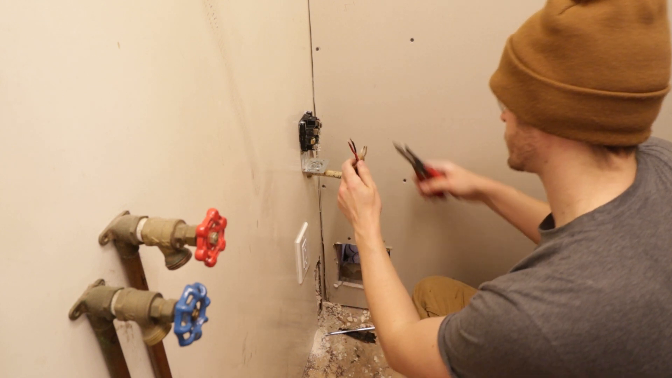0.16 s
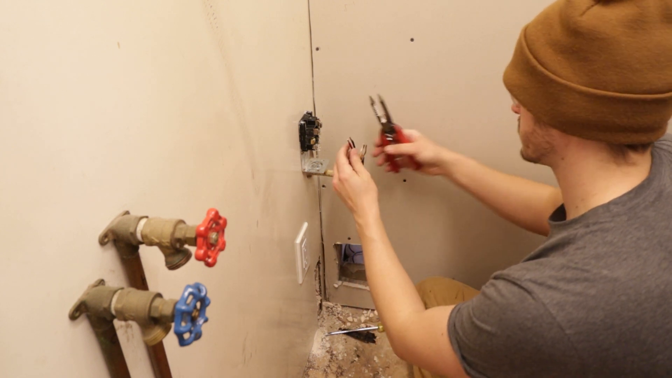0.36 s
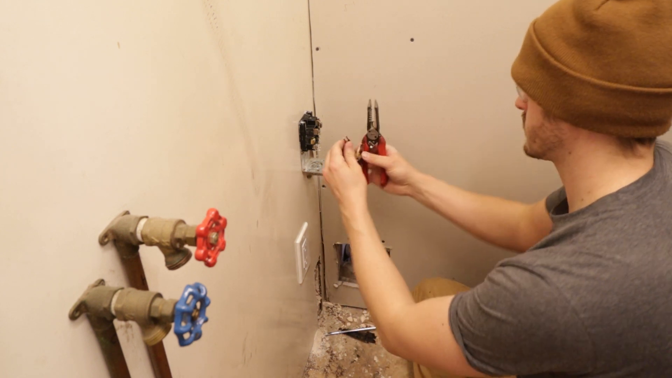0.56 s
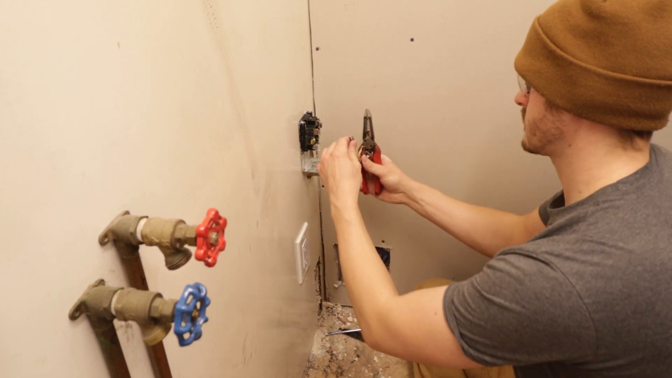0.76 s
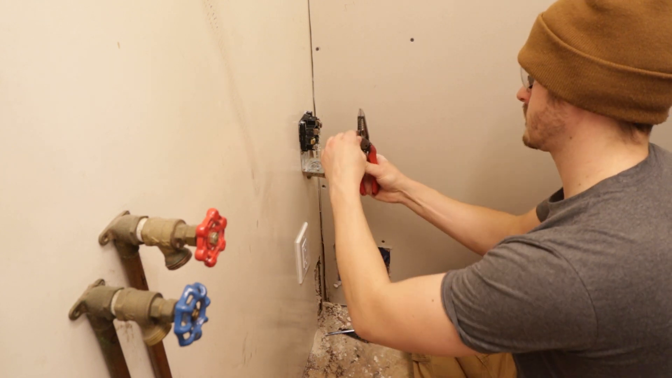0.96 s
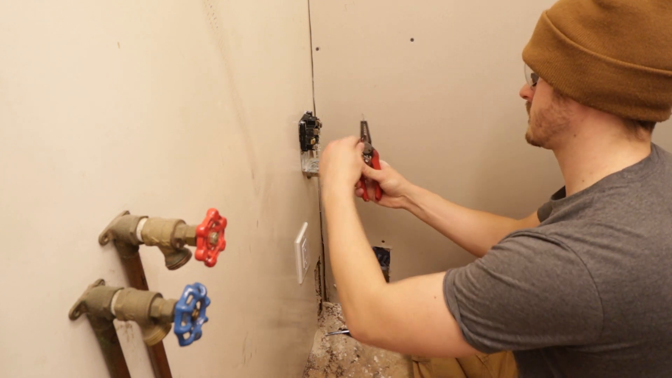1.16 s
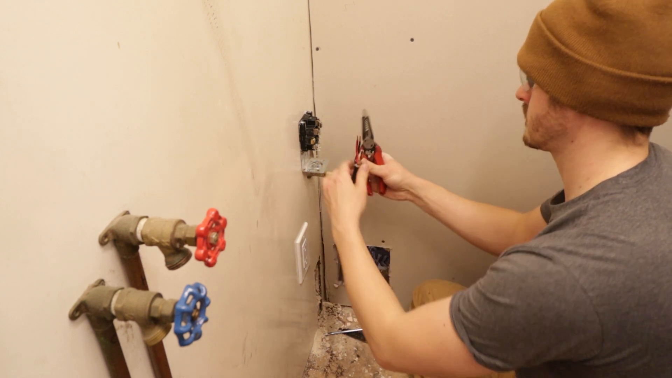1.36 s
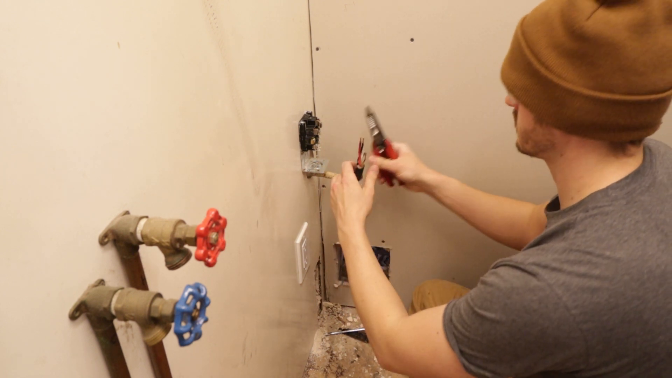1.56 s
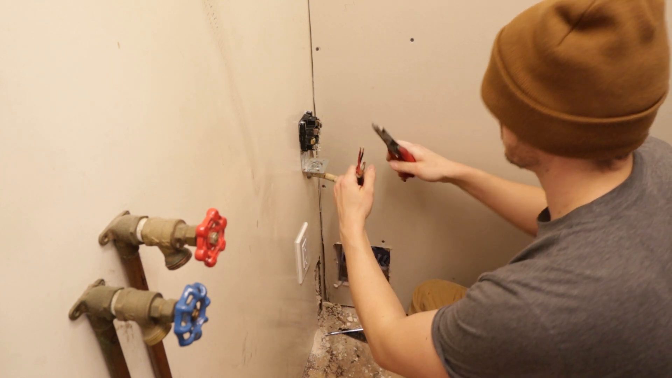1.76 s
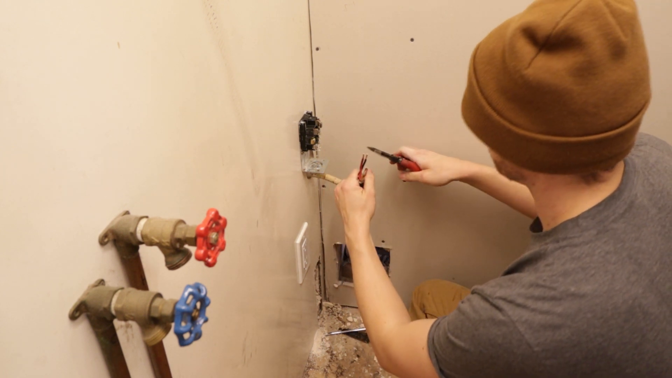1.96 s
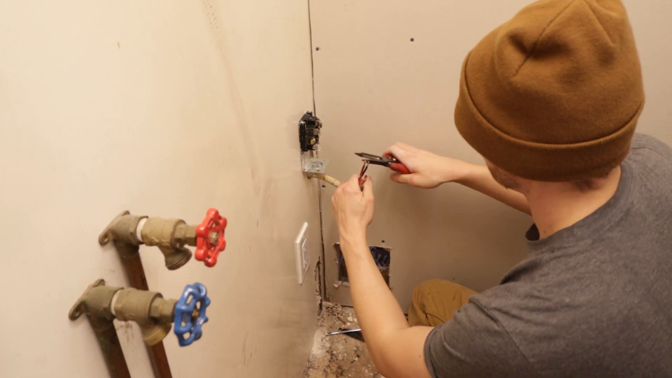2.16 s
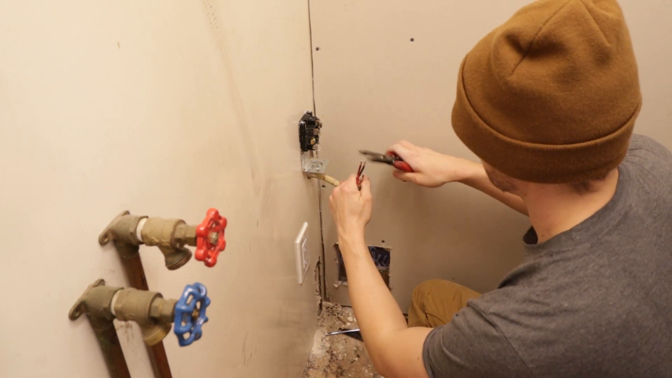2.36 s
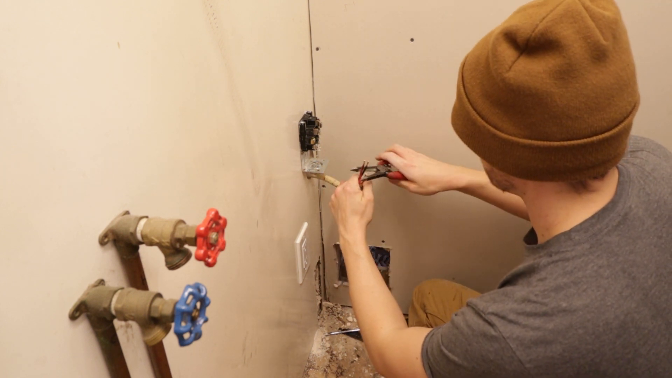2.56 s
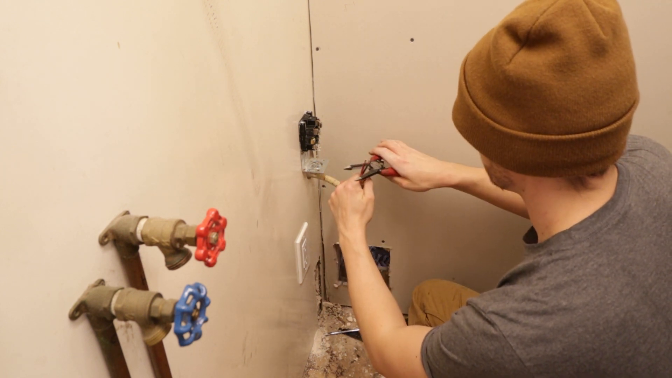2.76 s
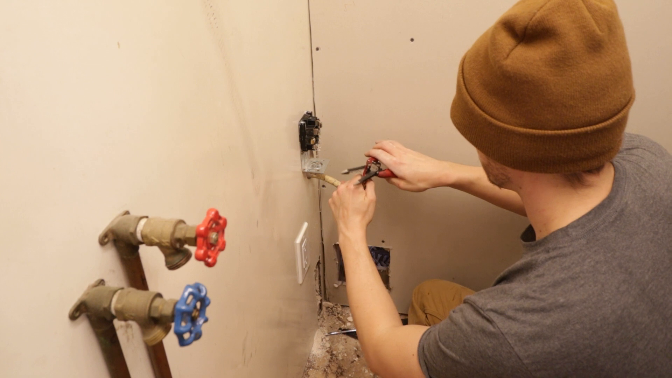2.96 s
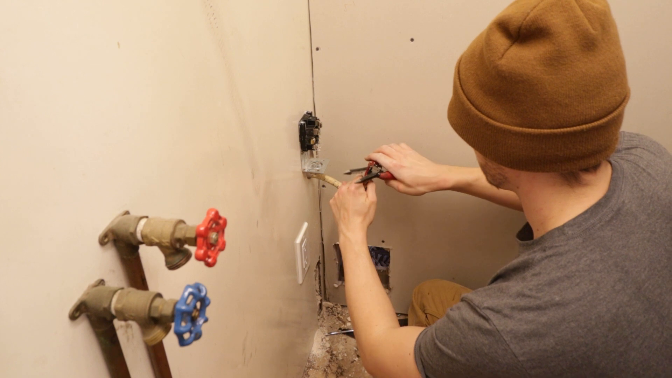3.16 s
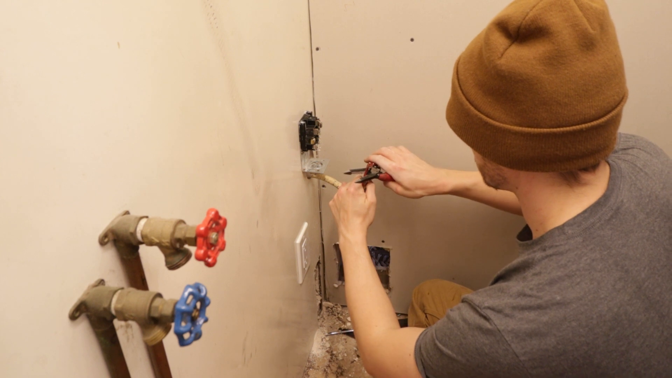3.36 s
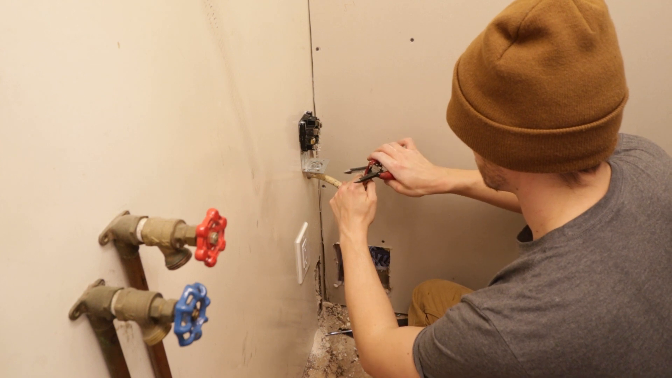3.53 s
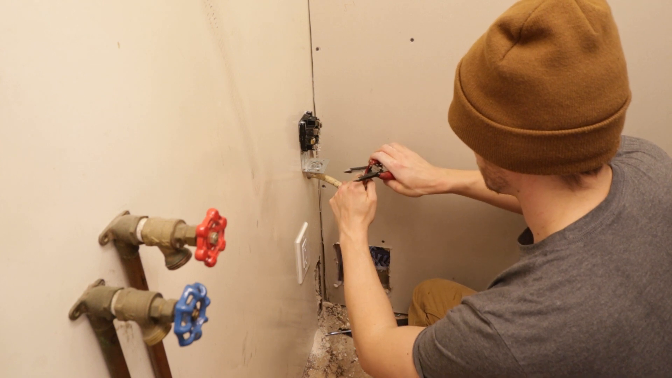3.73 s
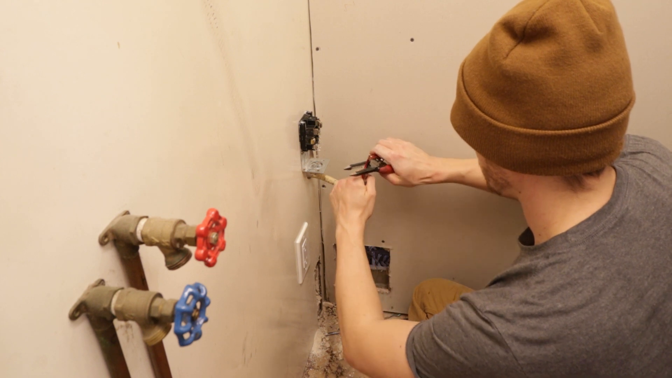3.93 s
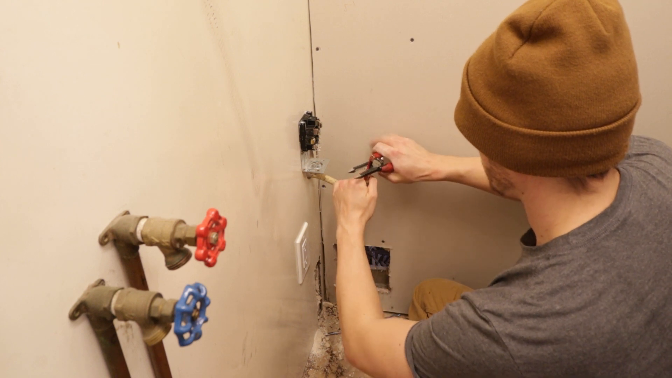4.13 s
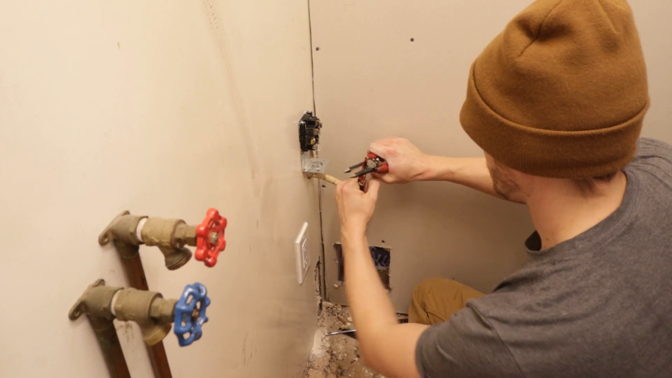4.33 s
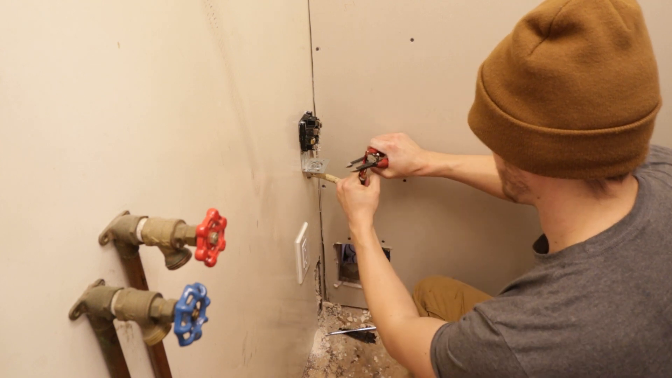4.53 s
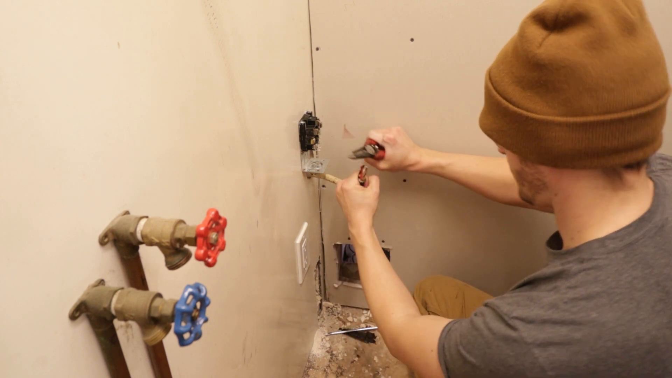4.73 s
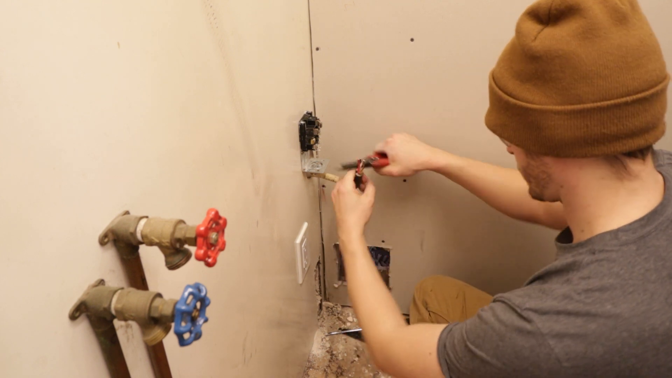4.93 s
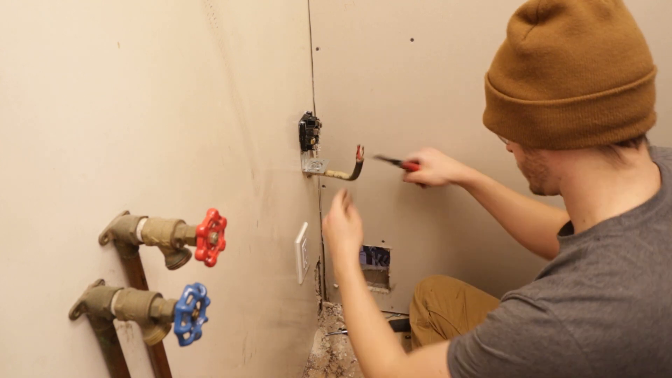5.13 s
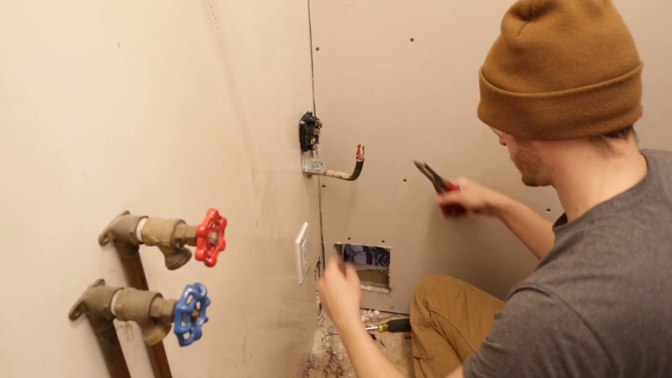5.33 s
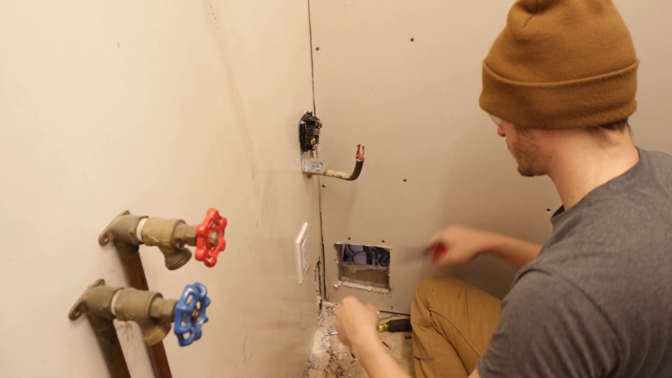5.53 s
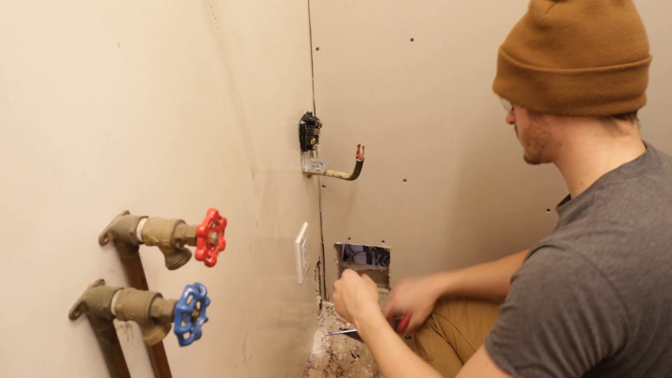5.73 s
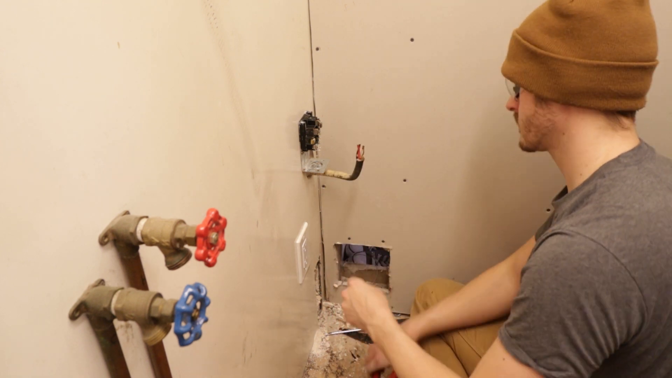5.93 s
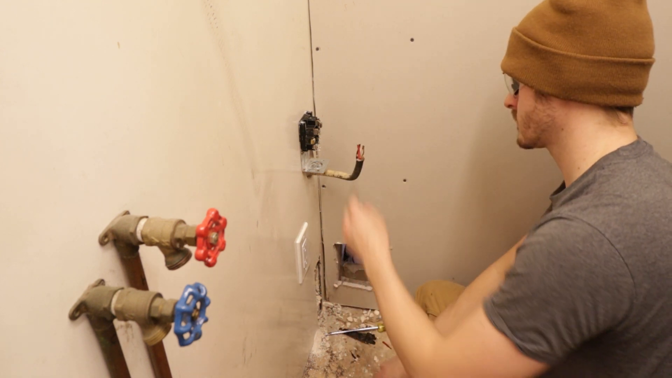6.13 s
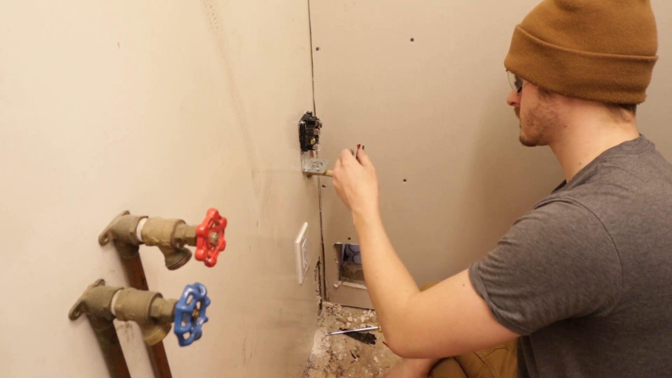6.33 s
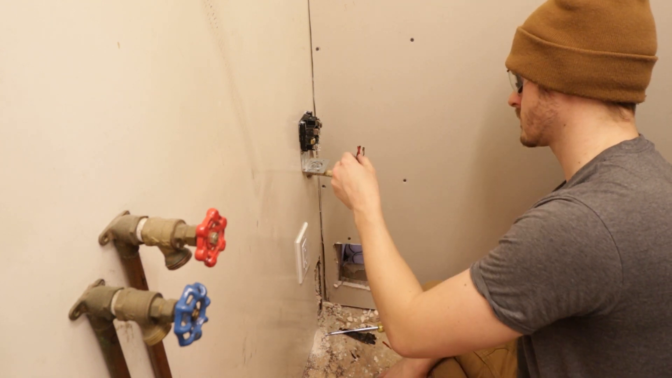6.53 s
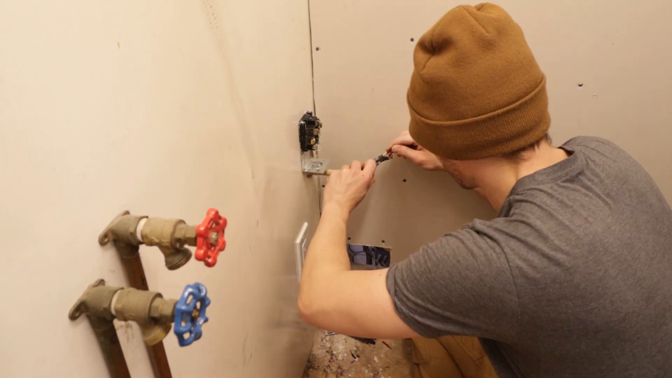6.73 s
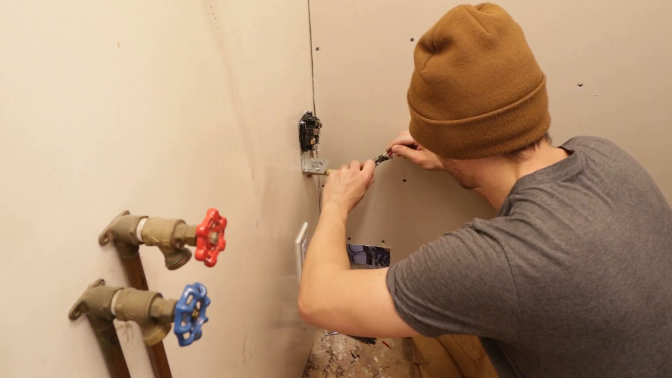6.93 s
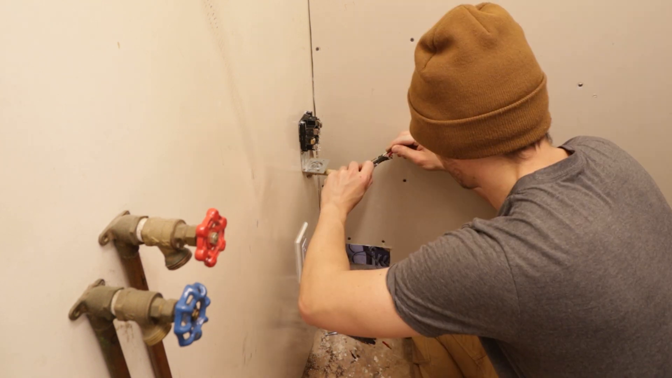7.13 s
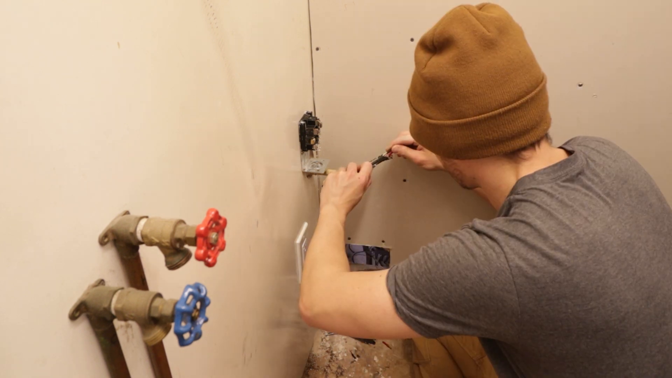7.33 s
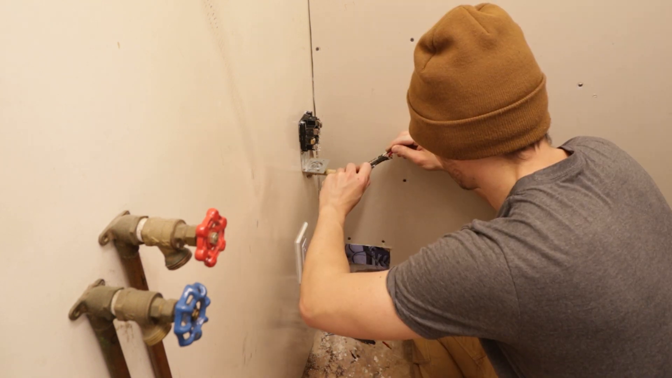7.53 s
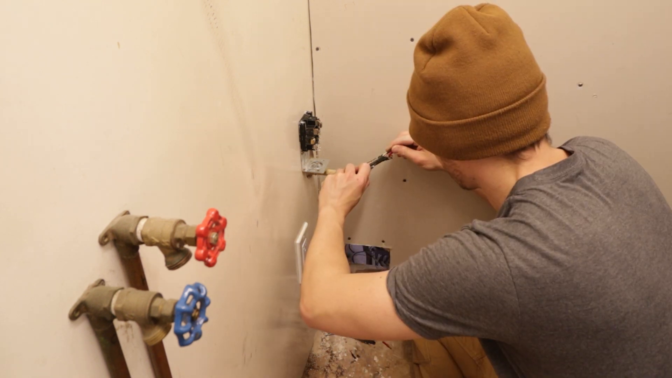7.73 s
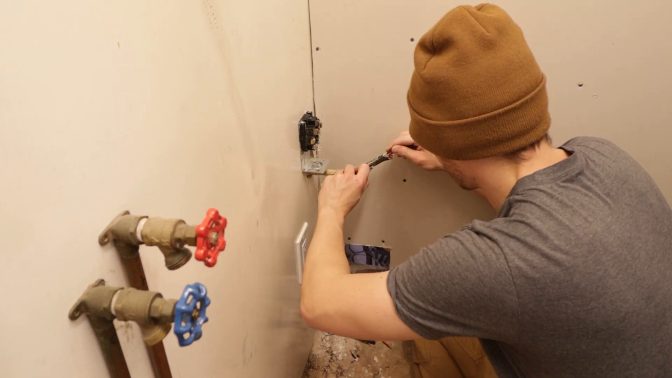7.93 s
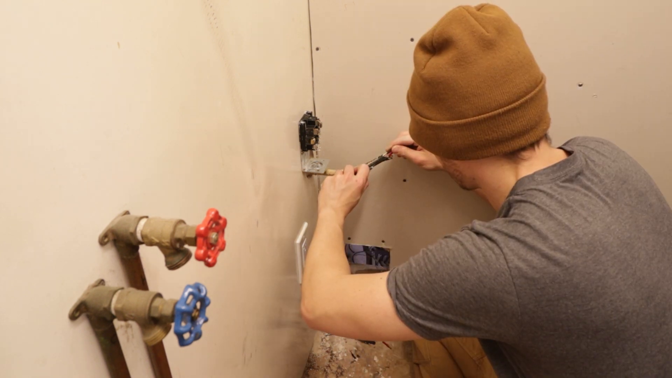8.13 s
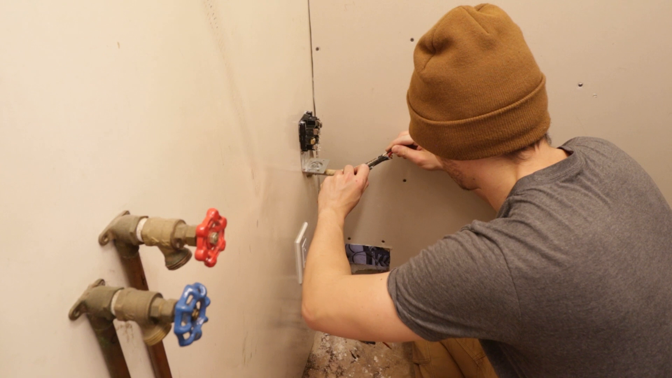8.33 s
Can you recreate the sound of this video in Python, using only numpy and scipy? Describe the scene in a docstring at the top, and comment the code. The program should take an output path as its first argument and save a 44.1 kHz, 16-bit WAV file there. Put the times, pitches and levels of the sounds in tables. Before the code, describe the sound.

In a small bare room, metal strippers click, scrape softly, bite through copper with one sharp snap, followed by tool clatter and hollow drywall knocks.

```python
"""Hand wire strippers clack open, are worked onto a copper cable in a wall, and bite through with one loud snap.
The offcut strikes wall and floor, the tool is put down, and a hand bends the cable, which thumps in the drywall.
Contacts ring resonant bodies through a small bare room; rubs, scratches and groans are swells of coloured noise.
Sleeves rustle over still air and a faint hum. One microphone feeds both channels, with a trace of hiss between them."""
import sys
import numpy as np
from scipy import signal
from scipy.fft import rfft, irfft, next_fast_len
from scipy.io import wavfile
from scipy.ndimage import uniform_filter1d, map_coordinates

SR = 44100
rng = np.random.default_rng(int(sys.argv[2]) if len(sys.argv) > 2 else 0)


def master_out(mix):
    """Clip the mix to full scale and print it as 16-bit PCM to the path in sys.argv[1]."""
    frames = np.transpose(np.atleast_2d(mix))
    ceiling = np.clip(frames, -1, 1)
    pcm = np.round(ceiling * 32767).astype(np.int16)
    wavfile.write(sys.argv[1], SR, pcm)


N = 374395
RESPONSE_SIZE = 32768  # samples
HZ = np.fft.rfftfreq(RESPONSE_SIZE, 1 / SR)
TIME_S = np.arange(N) / SR


def amp(db):
    """Decibels to gain."""
    return 10 ** (np.asarray(db) / 20)


def unit(x):
    """x at rms 1."""
    return x / np.sqrt(np.mean(x ** 2) + 1e-20)


def along(points, hz):
    """(frequency [Hz], value) points, interpolated on a log frequency axis."""
    point_hz, values = np.transpose(points)
    return np.interp(np.log(hz + 1), np.log(point_hz + 1), values)


def filtered(x, gain):
    """x times a gain that depends on frequency."""
    size = next_fast_len(N + RESPONSE_SIZE)
    spectrum = rfft(x, size) * gain(np.fft.rfftfreq(size, 1 / SR))
    return irfft(spectrum, size)[..., :N]


def causal(gain):
    """Minimum-phase response with this gain: it rings only after the blow."""
    cepstrum = irfft(np.log(np.maximum(gain, 1e-6)))
    cepstrum[1:RESPONSE_SIZE // 2] *= 2
    cepstrum[RESPONSE_SIZE // 2 + 1:] = 0
    return np.exp(rfft(cepstrum))


def lift(modes):
    """Narrow resonances as a lift in dB on the frequency grid."""
    return sum(db / (1 + (2 * (HZ - hz) / width_hz) ** 2) for hz, width_hz, db in modes)


def wobble(knots_per_s):
    """A smooth random curve through normally distributed knots."""
    knots = rng.standard_normal(int(N * knots_per_s / SR) + 4)
    return map_coordinates(knots, [TIME_S * knots_per_s])


def swell(middle_s, half_s, db):
    """A stroke's level rises and falls as a bell around its middle."""
    return amp(db) * np.exp(-((TIME_S - middle_s) / half_s) ** 2)


def rush(colour_db):
    """Noise of rms 1 in this colour."""
    response = irfft(causal(amp(colour_db)))
    return unit(signal.fftconvolve(rng.standard_normal(N), response)[:N])


# small bare room's decay: (frequency [Hz], t60 [s])
ROOM_DECAY = [(100, 0.19), (260, .25), (700, 0.1836), (1840, .21), (4850, .23), (8000, .2), (13000, 0.17)]


def corner(near_db, near_s, room_db):
    """A blow as it arrives: direct, then scattered by the close walls, then the room's tail."""
    t = np.arange(RESPONSE_SIZE) / SR
    near = rng.standard_normal(RESPONSE_SIZE) / (1 + (t / near_s) ** 6)
    hz, s, noise = signal.stft(rng.standard_normal(RESPONSE_SIZE), SR, nperseg=256)
    decay = amp(-60 * s / along(ROOM_DECAY, hz)[:, None])
    tail = signal.istft(noise * decay, SR, nperseg=256)[1][:RESPONSE_SIZE]
    direct = t == 0
    scattered = amp(near_db) * near / np.linalg.norm(near)
    return direct + scattered + amp(room_db) * tail / np.linalg.norm(tail)


def broad_gain(paths):
    """Smoothed gain of the paths; dividing by it leaves fine ripple but favours no broad band."""
    return np.sqrt(uniform_filter1d(np.abs(paths) ** 2, size=320))


def contacts(rows, body_db, near_db, near_s, room_db):
    """Each contact rings a body in the room, with its own low knock and bright edge."""
    out = np.zeros(N + RESPONSE_SIZE)
    low = 1 / (1 + (HZ / 550) ** 2)
    high = 1 - 1 / (1 + (HZ / 5500) ** 2)
    for s, db, knock_db, edge_db in rows:
        paths = rfft(corner(near_db, near_s, room_db))
        blow_db = db + body_db + knock_db * low + edge_db * high
        colour = causal(amp(blow_db) / broad_gain(paths))
        out[round(s * SR):][:RESPONSE_SIZE // 2] += irfft(paths * colour)[:RESPONSE_SIZE // 2]
    return out[:N]


def catches(rate_per_s, body_db, scatter_db, near_db, room_db):
    """Stick and slip at rms 1: small blows, uneven in time and size, ring a body in the room."""
    paths = rfft(corner(near_db, 0.0043, room_db))
    late, size = rng.random((2, 4096))
    at = ((np.arange(len(late)) + late) * SR / rate_per_s).astype(int)
    inside = at < N
    blows = np.bincount(at[inside], amp(scatter_db * size[inside]), N)
    response = irfft(paths * causal(amp(body_db) / broad_gain(paths)))
    return unit(signal.fftconvolve(blows, response)[:N])


# still air and hiss: (frequency [Hz], relative level [dB per Hz])
AIR_SPECTRUM = [(20, -21), (35, -29.5), (60, -6.5), (80, -10), (130, -12.5), (190, -17), (320, -18.5),
                (450, -21.5), (620, -23), (1000, -27), (1900, -33), (5000, -35.5), (15500, -38.5)]
# distant fan: (frequency [Hz], level [dB])
FAN_HUM = [(119, -83), (253.5, -72), (286, -81.5), (310, -87.5)]


def background():
    """Still air and hiss as coloured noise; a fan's hum as sines with slightly unsteady level and phase."""
    air = unit(filtered(rng.standard_normal(N), lambda hz: amp(along(AIR_SPECTRUM, hz))))
    hum = np.zeros(N)
    for hz, db in FAN_HUM:
        level = amp(db + wobble(6))
        hum += level * unit(np.sin(2 * np.pi * hz * TIME_S + .5 * wobble(2.0)))
    return amp(-68.5) * air + hum


# jaws and handles clack: (time [s], level [dB], bright edge [dB])
CLACK_BLOWS = [(.009, -14.5, 16), (.018, 1, 8), (0.0237, 3.5, 7.5), (0.2355, 3, 2.5), (.356, -7, 14.5),
               (.366, -6.5, 8), (.42, -13, -34), (0.458, -21, -12), (0.4971, -8, 6.5), (.537, -14.5, -6),
               (.645, -23.5, 3), (2.177, -22.5, 5), (2.552, -19.5, -34), (2.62, -30.5, -5),
               (5.3822, 0.5, -3.5), (5.4089, 7.5, -0.5), (5.4135, 5.5, -2), (5.549, 2.5, -12),
               (5.5872, 0, -31), (5.639, -4, -14.5), (6.908, -28, -29)]
# jaws close through the cable: (time [s], level [dB], low knock [dB], bright edge [dB])
CUT_BLOWS = [(4.711, -55, -1.5, -4), (4.7312, -21, 3.5, -22), (4.7331, -6.5, -1.5, -3.5),
             (4.7338, -1, 0.5, 4), (4.7361, -6.5, -3.5, -1.5)]
# steel tool and snap spectra: (frequency [Hz], level [dB per Hz])
STEEL_SPECTRUM = [(40, -14), (95, -22), (160, 1), (330, -4.5), (480, 1), (750, -3.5), (1500, -3.5),
                  (3300, -6), (5200, -11), (7500, -17), (10500, -23.5), (16000, -33)]
SNAP_SPECTRUM = [(30, -2.5), (90, -3.5), (150, 14.5), (250, 21), (380, 18.5), (600, 23), (850, 11.5),
                 (1500, 9.5), (2400, 14), (4500, 13.5), (5200, 10), (7000, 13), (8500, 9.5), (10300, -2),
                 (14500, 5)]
# resonances of loose tool, jaws and jerked wall: (frequency [Hz], width [Hz], lift [dB])
HANDLE_MODES = [(1700, 110, 2.3), (1956, 76, 3.2), (3470, 29, 3.2), (4420, 120, 4.7), (6770, 55, 5.7)]
JAW_MODES = [(2790, 260, 8), (3450, 53, 7), (3500, 46, 6), (4176, 220, 7), (4460, 120, 5.5)]
PANEL_MODES = [(162, 23, 7), (243, 38, 7.4), (465, 30, 3.7), (551, 59, 6.7)]
CLACK_KNOCK_DB = -4.5  # the light tool has little low knock


def strippers():
    """Light clacks of the loose tool, and the snap that rings jaws and wall as the copper parts."""
    blows = [(s, db, CLACK_KNOCK_DB, edge_db) for s, db, edge_db in CLACK_BLOWS]
    tool_db = along(STEEL_SPECTRUM, HZ) + lift(HANDLE_MODES)
    clacks = contacts(blows, tool_db, near_db=12, near_s=0.0033, room_db=8)
    snap_db = along(SNAP_SPECTRUM, HZ) + lift(JAW_MODES) + lift(PANEL_MODES)
    snap = contacts(CUT_BLOWS, snap_db, near_db=4.0, near_s=0.0029, room_db=-1)
    return clacks + snap


# hand works the tool along the cable:
# (middle time [s], half length [s], dull rub level [dB], dry scratch level [dB])
HAND_STROKES = [(0.587, 0.072, -65, -64), (0.756, 0.057, -67.5, -74), (1.025, 0.11, -57.5, -69),
                (1.58, 0.042, -66.5, -71), (1.814, 0.089, -63.5, -78), (2.191, 0.014, -57.5, -63),
                (2.265, .046, -57.5, -66), (2.394, 0.048, -56.5, -68), (3.933, 0.016, -81, -71.5),
                (4.4, 0.22, -68.5, -77.5), (4.857, 0.084, -60, -66)]
# rub and scratch spectra: (frequency [Hz], relative level [dB per Hz])
RUB_SPECTRUM = [(30, -24), (90, -7.5), (160, -3.5), (350, -3.5), (470, -9), (620, -3), (900, -13),
                (1600, -26.5), (4000, -33), (16000, -63.5)]
SCRATCH_SPECTRUM = [(200, -27), (900, 1.5), (2000, 1), (4200, -3.5), (5600, -8), (8000, -12),
                    (11000, -23.5), (16000, -25)]
# jaws sliding on the sheath: (frequency [Hz], width [Hz], lift [dB])
SCRAPE_MODES = [(2820, 200, 4.5), (3532, 230, 8.6), (3927, 41, 2), (4600, 190, 7), (6162, 220, 6)]
RUB_HZ, RUB_WIDTH_HZ, RUB_LIFT_DB = 300, 390, 5.5  # sleeve's dull resonance
TICKS_PER_S, TICK_DB = 35, -4.5  # jaws catch during a stroke; level re scratch


def hands():
    """Every stroke swells and fades: a dull rub, with a dry scratch and small ticks that ring the jaws."""
    rub = sum(swell(s, half_s, db) for s, half_s, db, _ in HAND_STROKES)
    scratch = sum(swell(s, half_s, db) for s, half_s, _, db in HAND_STROKES)
    rub_db = along(RUB_SPECTRUM, HZ) + lift([(RUB_HZ, RUB_WIDTH_HZ, RUB_LIFT_DB)])
    sleeve = rush(rub_db) * unit(amp(2.3 * wobble(60)))
    # the jaws catch and slide in a dense grain
    grain = rng.standard_normal(N) * amp(4 * wobble(260))
    scrape_db = along(SCRATCH_SPECTRUM, HZ) + lift(SCRAPE_MODES)
    ringing = signal.fftconvolve(grain, irfft(causal(amp(scrape_db))))[:N]
    tick_db = along(STEEL_SPECTRUM, HZ) + lift(SCRAPE_MODES)
    ticks = catches(TICKS_PER_S, tick_db, scatter_db=11, near_db=7, room_db=1)
    return rub * sleeve + scratch * unit(unit(ringing) + amp(TICK_DB) * ticks)


# cable knocks in the wall: (time [s], level [dB])
WALL_THUMPS = [(0.979, -25), (2.665, -23.5), (2.77, -29.5), (3.006, -26.5), (6.2637, 7.5), (6.294, -5.5),
               (6.371, -4.5), (6.478, -19.5), (6.578, -17), (6.617, -9.5)]
# cable bends, groans and slips in its hole:
# (middle time [s], half length [s], groan level [dB], slips level [dB])
CABLE_BENDS = [(2.695, .035, -65.5, -74), (5.158, 0.043, -47.5, -64), (6.401, 0.057, -47.5, -46.5),
               (6.617, 0.054, -53, -54.5)]
# wall and groan spectra: (frequency [Hz], level [dB per Hz]); both relative in the bends
DRYWALL_SPECTRUM = [(30, -14), (85, 0.5), (140, 11), (220, 5.5), (380, 10.5), (650, 4.5), (830, -8),
                    (1130, -12), (1550, -5), (2400, -17), (4200, -26), (5500, -29.5), (9000, -36),
                    (16000, -60)]
GROAN_SPECTRUM = [(30, -22), (90, -10.5), (160, -6), (280, 1.5), (380, -8), (620, -17.5), (900, -26),
                  (5000, -50)]
# hollow behind the board: (frequency [Hz], width [Hz], lift [dB])
CAVITY_MODES = [(141, 35, 5.1), (301, 46, 6), (631, 66, 4.8), (1390, 58, 7.5), (4130, 180, 12)]
SLIPS_PER_S = 120
DULLING_DB_PER_DB = 0.24  # low knock gained for each dB softer


def cable():
    """The stiff cable levers against the hollow wall: soft thumps are duller, and bends groan and slip."""
    wall_db = along(DRYWALL_SPECTRUM, HZ) + lift(CAVITY_MODES)
    blows = [(s, db, -DULLING_DB_PER_DB * db, 0) for s, db in WALL_THUMPS]
    thumps = contacts(blows, wall_db, near_db=7.5, near_s=0.0058, room_db=7)
    groan_level = sum(swell(s, half_s, db) for s, half_s, db, _ in CABLE_BENDS)
    groan = groan_level * rush(along(GROAN_SPECTRUM, HZ))
    slip_level = sum(swell(s, half_s, db) for s, half_s, _, db in CABLE_BENDS)
    slips = slip_level * catches(SLIPS_PER_S, wall_db, scatter_db=4, near_db=6, room_db=4)
    return thumps + groan + slips


def jolt(start_s, db, hz, t60_s):
    """The cable springs free and gives the wall one low push: a decaying cosine."""
    t = np.clip(TIME_S - start_s, 0, None)
    return (t > 0) * amp(db - 60 * t / t60_s) * np.cos(2 * np.pi * hz * t)


# offcut on wall, then floor: (time [s], level [dB], low knock [dB], bright edge [dB])
WALL_BOUNCES = [(4.9875, -3, 3, -11), (5.0046, 7.5, 2, 3), (5.0135, 7.5, -18, -1), (5.0185, -5, 8, -28)]
FLOOR_LANDING = [(5.2125, -5, -13, 4), (5.2155, -1.5, 0, -4.5), (5.235, -16, 8.5, -9)]
# offcut and floor spectra: (frequency [Hz], level [dB per Hz])
OFFCUT_SPECTRUM = [(50, -26), (200, -18), (450, -2), (750, -2.5), (1050, 2), (1500, 0.5), (2200, 1),
                   (3300, -2), (5000, -15), (7000, -29), (9000, -41.5), (14000, -44)]
FLOOR_SPECTRUM = [(50, -2), (200, 4), (450, 8.5), (950, 8), (1500, 2.5), (3000, 0), (4400, -17),
                  (6000, -20), (10000, -26.5), (15000, -27)]
# resonances of the severed end and the floor: (frequency [Hz], width [Hz], lift [dB])
SHEATH_MODES = [(1043, 190, 5.6), (2100, 160, 4.9), (3030, 220, 1.53)]
BOARD_MODES = [(657, 95, 9.4), (955, 180, 3.2), (1985, 144, 7.5)]


def offcut():
    """The severed end flies off, rattles against the wall and lands, ringing itself and the floor."""
    end_db = along(OFFCUT_SPECTRUM, HZ) + lift(SHEATH_MODES)
    rattle = contacts(WALL_BOUNCES, end_db, near_db=15.0, near_s=0.0058, room_db=14.0)
    floor_db = along(FLOOR_SPECTRUM, HZ) + lift(BOARD_MODES)
    landing = contacts(FLOOR_LANDING, floor_db, near_db=2, near_s=0.0034, room_db=-1.0)
    return rattle + landing


def channel_hiss():
    """Faint, nearly flat noise: the trace by which the two channels differ."""
    points = [(100, 0.5), (1000, 3.0), (12000, -0.5)]  # (frequency [Hz], relative level [dB])
    return amp(-78.0) * unit(filtered(rng.standard_normal(N), lambda hz: amp(along(points, hz))))


def scene():
    """All sources at the one microphone; hiss is added left and subtracted right."""
    mono = background() + strippers() + hands() + cable()
    mono += jolt(4.7328, db=-18.5, hz=243, t60_s=.03) + offcut()
    trace = channel_hiss()
    return np.array([mono + trace, mono - trace])


TOP_HZ = 15850


def record(dry):
    """The recorder rounds off the very highest peaks and drops deep rumble and all above its band limit."""
    rounded = dry / (1 + (np.abs(dry) / .8) ** 6) ** (1 / 6)
    no_rumble = signal.lfilter(*signal.butter(2, 42, "highpass", fs=SR), rounded)
    return filtered(no_rumble, lambda hz: 1 / (1 + (hz / TOP_HZ) ** 120))


dry = scene()
out = record(dry)
master_out(out)
```